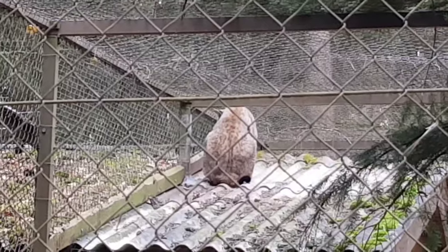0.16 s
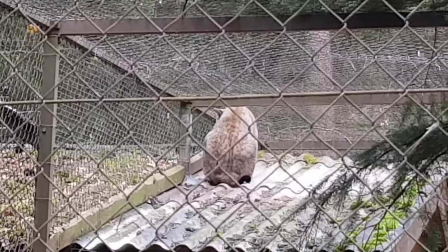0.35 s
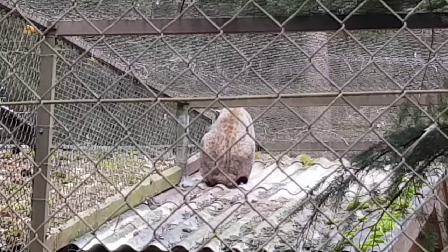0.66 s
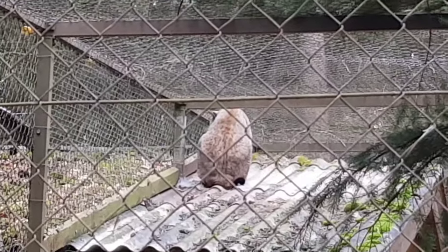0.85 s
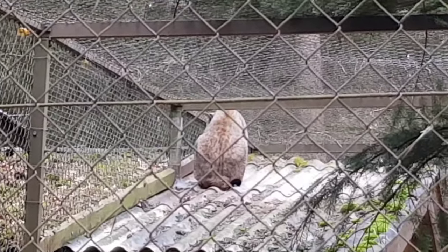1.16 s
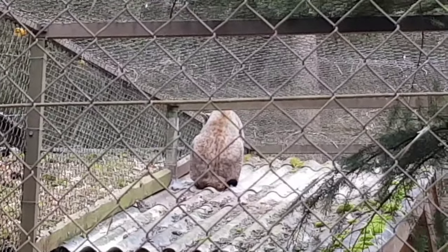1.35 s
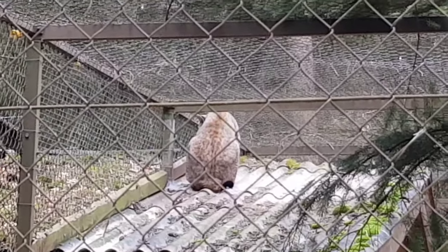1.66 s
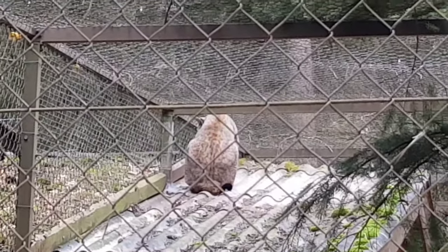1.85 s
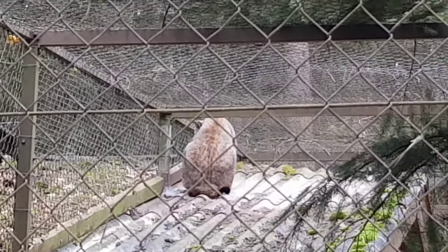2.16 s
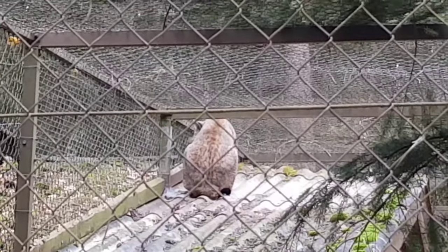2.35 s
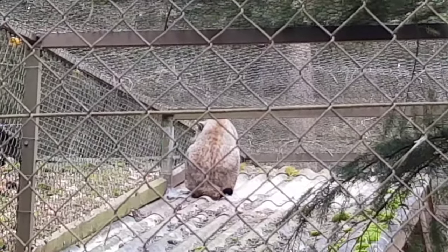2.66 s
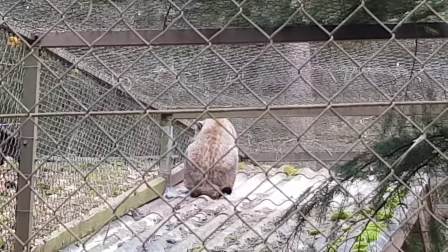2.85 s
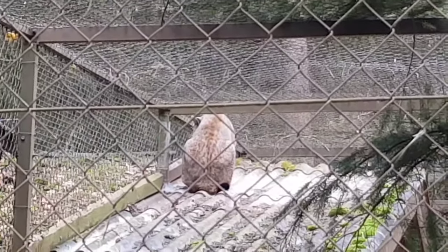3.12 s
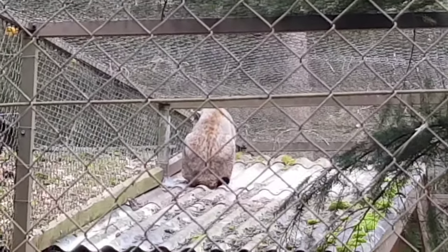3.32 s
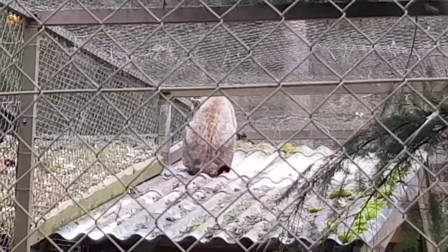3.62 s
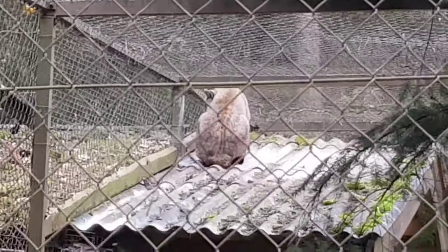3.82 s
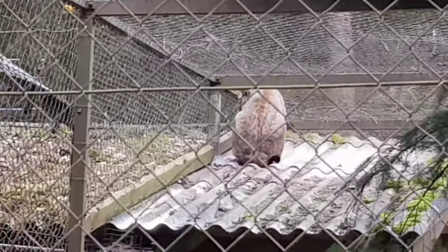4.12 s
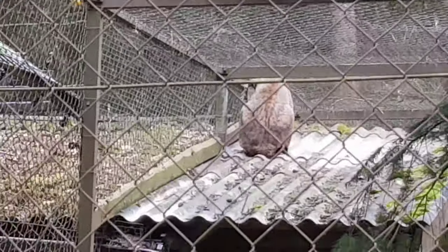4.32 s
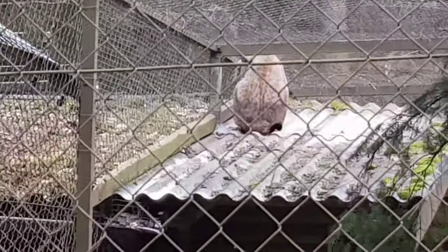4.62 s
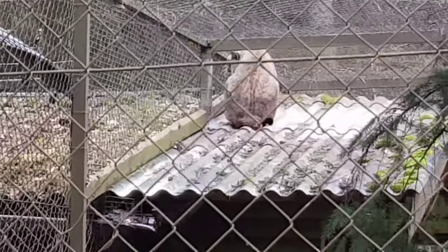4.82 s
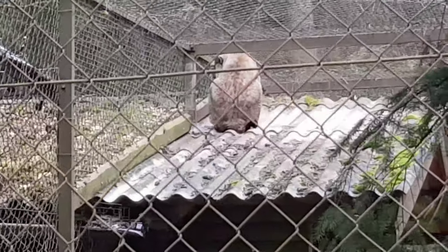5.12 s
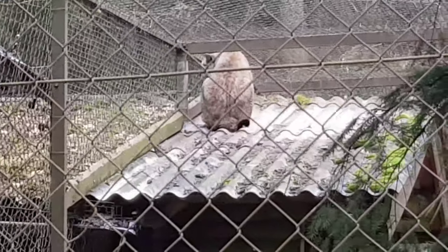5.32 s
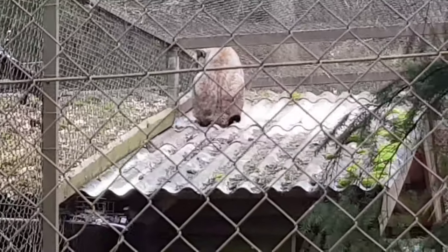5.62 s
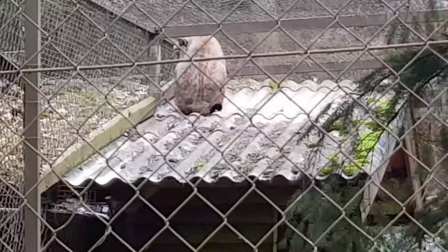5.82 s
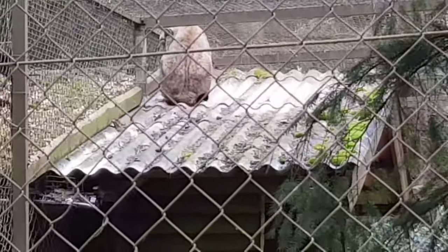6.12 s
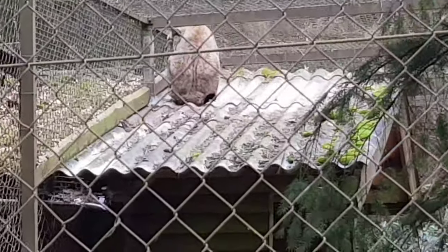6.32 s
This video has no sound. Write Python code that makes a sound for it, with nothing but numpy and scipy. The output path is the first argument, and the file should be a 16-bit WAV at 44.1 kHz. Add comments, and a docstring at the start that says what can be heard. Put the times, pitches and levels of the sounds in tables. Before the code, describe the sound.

A lynx yowls three times, each call rising and sliding down, while small birds whistle and chatter faintly among the trees.

```python
"""A lynx yowling among trees.

A lynx on a shed roof yowls three times, its vocal folds arching up in pitch and sliding down; a second
cat joins the third call. A tit sings two-note phrases, another bird chatters in arched notes, others
whistle and twitter further off. Trees and pens throw the voices back over soft air and a low rumble;
a sleeve rustles and fingers knock close to the microphone."""
import sys
import numpy as np
from scipy import signal
from scipy.fft import rfft, irfft
from scipy.io import wavfile

SR = 44100
rng = np.random.default_rng(int(sys.argv[2]) if len(sys.argv) > 2 else 0)


def int16_out(signal):
    """Quantize to a 16-bit WAV file."""
    q = np.round(np.clip(np.atleast_2d(signal).T, -1, 1) * 32767)
    wavfile.write(sys.argv[1], SR, q.astype(np.int16))


N = 285500
TIME = np.arange(N) / SR
FREQS = np.fft.rfftfreq(N, 1 / SR) + 1e-3


def undb(db):
    """Amplitude ratio of a level in decibels."""
    return 10 ** (np.asarray(db) / 20)


def curve(rows, at=TIME):
    """Linear interpolation of each later column of a table against its first."""
    knots, *columns = np.transpose(rows)
    return [np.interp(at, knots, column) for column in columns]


def colour(points, hz):
    """Interpolation of a spectrum on a log-frequency axis."""
    knots_hz, value = np.transpose(points)
    return np.interp(np.log(hz), np.log(knots_hz), value)


def noise(points):
    """White noise filtered to a spectrum of (Hz, dB) points, at rms 1."""
    x = irfft(rfft(rng.standard_normal(N)) * undb(colour(points, FREQS)), N)
    return x / x.std()


def wander(rate_hz, size=N):
    """Random modulation: low-passed noise of standard deviation 1."""
    x = signal.sosfilt(signal.butter(2, rate_hz, fs=SR, output="sos"), rng.standard_normal(size))
    return x / x.std()


def fade(size, edge_s):
    """A gate with raised-cosine edges."""
    k = np.arange(size)
    return np.sin(np.pi / 2 * np.clip(np.minimum(k, k[::-1]) / (edge_s * SR), 0, 1)) ** 2


def add(track, start_s, x):
    """Superposition of a sound on a track."""
    i = max(int(start_s * SR), 0)
    track[i:i + len(x)] += x[:max(N - i, 0)]


def pan(db):
    """Direction by level difference, left minus right."""
    return undb(np.array([[db], [-db]]) / 2)


def ports(mid, side):
    """Spatial coherence: diffuse sound differs between two close microphone ports mostly in the treble."""
    width = [(60, -30), (250, -16), (600, -17), (1200, -8), (2400, -10), (5000, -11), (12000, -7.5)]
    side = irfft(rfft(side) * undb(colour(width, FREQS)), N)
    return np.array([mid + side, mid - side])


def wood(x, wet_db, build_s, early_db, early_s, shade_db=0, linger=1):
    """Reverberation: roof and fences scatter the sound early, trunks keep it ringing."""
    # Each row: band frequency in Hz, reverberation time in seconds (scaled by linger), relative dB.
    bands = [(256, 0.35, 15.5), (600, 1.74, -0.5), (1310, 1.56, 0), (2400, 1.75, 7.5), (4200, 1.16, 6),
             (9000, 1.4, 5.5)]
    t = TIME[:int(1.6 * SR)]
    hz = np.fft.rfftfreq(len(t), 1 / SR) + 1
    spectra = rfft(rng.standard_normal((2, len(t))))
    tails = 0
    for band, (_, t60, db) in enumerate(bands):
        share = colour([(row[0], k == band) for k, row in enumerate(bands)], hz)
        tails = tails + irfft(spectra * share, len(t)) * undb(db - 60 * t / (t60 * linger))
    tails = tails * (1 - np.exp(-t / build_s)) * (1 + undb(early_db) * np.exp(-t / early_s))
    mid, side = signal.fftconvolve(x[None], tails / np.sqrt(SR / 10), axes=1)[:, :N] * undb(wet_db)
    # Directivity: a caller facing away loses direct treble.
    direct = irfft(rfft(x) * undb(colour([(1300, 0.018), (2600, shade_db)], FREQS)), N)
    return ports(direct + mid, side)


def outdoors():
    """Ambient noise: soft forest air over a distant, slowly swelling rumble."""
    # Spectra. Each row: frequency in Hz, relative level in dB.
    air_spectrum = [(15, -45), (25, -16), (82, -3.5), (140, -3), (198, -19), (378, -16.5), (1140, -9),
                    (1900, -15.5), (2850, -24), (3530, -32), (3930, -28.5), (4380, -8), (4750, -32.5),
                    (6550, -58.5), (15500, -30)]
    rumble_spectrum = [(20, -10.5), (35, -11.5), (50, -0.5), (75, -0.5), (110, -8.5), (160, -18.5),
                       (250, -23), (500, -42)]
    # Envelopes. Each row: time in seconds, level in dB.
    air_level = [(0, -63), (.4, -70), (1.6, -62.5), (6.47, -61.5)]
    rumble_level = [(0, -58.5), (.8, -56), (1.8, -60.5), (2.3, -58.5), (6.47, -58)]
    air = ports(noise(air_spectrum), noise(air_spectrum)) * undb(curve(air_level)[0] + 0.5 * wander(4))
    rumble = ports(noise(rumble_spectrum), noise(rumble_spectrum))
    return air + rumble * undb(curve(rumble_level)[0] + 0.23 * wander(10))


def note(shape, length_s, db, ratio=1, harmonics=((1, 0),), waver=0.0042):
    """Frequency modulation: a wavering tone follows a contour; a beak passes few overtones above 7 kHz."""
    size = int(length_s * SR)
    hz, shape_db = curve(shape, np.linspace(0, 1, size))
    hz = hz * ratio * (1 + waver * wander(200, size))
    phase = 2 * np.pi * np.cumsum(hz) / SR
    tone = 0
    for k, harmonic_db in harmonics:
        beak_loss = 1 + (k > 1) * (k * hz / 6900) ** 24
        tone = tone + undb(harmonic_db) * np.sin(k * phase) / beak_loss
    return np.sqrt(2) * tone * undb(db + shape_db) * fade(size, 0.00022)


def glides(rows, waver):
    """Linear frequency sweeps: short tones that swell as they slide."""
    out = np.zeros(N)
    for start, length, start_hz, end_hz, db in rows:
        shape = [(0, start_hz, 7), (.5, (start_hz + end_hz) / 2, 12.5), (1, end_hz, 3.5)]
        add(out, start, note(shape, length, db, waver=waver))
    return out


def sleeve(roundness=1.77):
    """Friction: cloth hisses in swelling rubs, some dull and some bright, and now and then squeaks."""
    # Each row: frequency in Hz, relative level in dB.
    cloth_spectrum = [(1500, -3.5), (3000, 4), (6000, 0.5), (9000, -7.5), (13000, -6), (15500, -9.5)]
    # Each row: peak time, swell and fade in seconds, level in dB, tilt towards the treble in dB.
    rubs = [(.58, 0.045, 0.038, -67, -6), (1.86, 0.14, 0.17, -59.5, -2), (2.55, 0.3, 0.45, -69.5, 3),
            (3.05, 0.15, 0.18, -75, 12), (3.28, 0.12, 0.44, -66.5, -6.5), (4.7, 0.45, 0.42, -69, 0.5),
            (5.8, 0.078, 0.11, -71.5, 12.5), (6.04, 0.069, 0.13, -49, 2.5), (6.47, 0.14, .05, -61, -3)]
    # Each row: start and length in seconds, first and last pitch in Hz, relative level in dB.
    squeaks = [(2.95, 0.13, 11550, 11000, -77.5), (3.05, 0.078, 11250, 10000, -81.5),
               (3.05, .09, 14000, 12800, -77), (3.19, 0.08, 10150, 9860, -84),
               (3.2, .08, 12300, 12800, -80), (3.42, .1, 9900, 9640, -85)]
    dull = signal.sosfilt(signal.butter(2, 8000, fs=SR, output="sos"), noise(cloth_spectrum))
    bright = signal.sosfilt(signal.butter(2, 8000, "high", fs=SR, output="sos"), noise(cloth_spectrum))
    out = 0
    for peak_s, swell_s, fade_s, db, tilt_db in rubs:
        from_peak = np.maximum((peak_s - TIME) / swell_s, (TIME - peak_s) / fade_s)
        envelope = np.exp(-np.minimum(from_peak, 10) ** roundness)
        out = out + (dull * undb(db - tilt_db) + bright * undb(db + tilt_db)) * envelope
    return out * undb(wander(40)) + glides(squeaks, waver=0.013)


def handling():
    """Contact noise: the sleeve rubs, fingers knock the case, a puff of air buffets the ports."""
    # Each row: time in seconds, relative level in dB, centre in Hz, width in octaves, decay in seconds.
    knocks = [(5.202, -56, 260, 0.96, 0.0058), (5.721, -40.5, 6200, 0.6, 0.0003),
              (5.997, -51.5, 215, 0.62, 0.0034)]
    # Each row: time in seconds, level in dB.
    puff_level = [(.46, -89), (.53, -52.5), (.62, -54.5), (.7, -65)]
    out = sleeve()
    for at_s, db, hz, octaves, decay_s in knocks:
        burst = rng.standard_normal(N) * np.exp(-np.abs(TIME - at_s) / decay_s)
        band = np.exp(-.5 * (np.log2(FREQS / hz) / octaves) ** 2)
        knock = irfft(rfft(burst) * band, N)
        out = out + 2 * undb(db) * knock / np.abs(knock).max()
    puff = undb(curve(puff_level)[0]) * (TIME > puff_level[0][0]) * (TIME < puff_level[-1][0])
    return out + puff * noise([(70, -24), (130, -7), (215, -17.5), (270, -23), (500, -51)])


def twitter(count=70, far_db=-70, low_hz=1900, high_hz=3600, start_s=2.4):
    """Fast pitch modulation makes twittering scratchy: a few nearer notes among many faint far ones."""
    # Each row: start and length in seconds, first and last pitch in Hz, relative level in dB.
    near = [(5.68, 0.018, 2244, 2080, -67.5), (5.87, 0.054, 3230, 3150, -77),
            (6.04, 0.044, 2880, 2600, -66), (6.1, 0.029, 2183, 2935, -64), (6.17, 0.0275, 2750, 2450, -66),
            (6.28, 0.0436, 2480, 3040, -66.5), (6.335, 0.021, 2750, 2210, -62.5),
            (6.413, 0.02, 3330, 2800, -60.5), (6.43, 0.028, 2005, 2350, -70)]
    when, length, pitch, slide, strength = rng.random((count, 5)).T
    hz = low_hz + (high_hz - low_hz) * pitch
    starts = start_s + (N / SR - start_s) * when
    end_hz = hz * (0.98 + 0.405 * slide)
    far = zip(starts, 0.0127 + 0.0151 * length, hz, end_hz, far_db + 5 * (strength - .5))
    return glides(near, waver=0.053) + glides(far, waver=0.0496)


def chatter(notes_per_s=8.1, sag_per_s=.1, swell_db=2.5, scatter_db=2.5, bend=0.0519, lead_s=0.021):
    """Strong harmonics make a bird's arched notes harsh; a short falling tick leads each one in."""
    # Note contours. Each row: fraction of the note, pitch in Hz before transposing, relative dB.
    arched = [(0, 1470, -6.5), (0.18, 2006, -9.5), (.36, 2280, -0.5), (0.541, 2056, -5), (.76, 1745, -7.5),
              (1, 1512, -7)]
    tick = [(0, 2606, -3.5), (.3, 2400, 1), (1, 2025, -16.5)]
    # Each row: harmonic number, relative level in dB.
    partials = [(1, -4.5), (2, 1), (3, -3), (4, -4)]
    # Each row: first and last onset in seconds, relative dB, opening pitch ratio, fundamental lift in dB.
    runs = [(2.122, 2.122, -53, 1.13, 0.5), (2.407, 2.914, -48.5, 1.2, -2), (3.238, 4.355, -50, 1.07, -1.5),
            (4.417, 4.527, -53, 1.02, 8), (4.499, 4.984, -47.5, 0.95, -2), (5.124, 5.247, -48.5, .92, -14),
            (5.324, 5.68, -60.5, .97, 4.5), (6.323, 6.43, -51, 0.98, -0.5)]
    out = np.zeros(N)
    for first_s, last_s, run_db, first_ratio, lift_db in runs:
        count = round((last_s - first_s) * notes_per_s) + 1
        harmonics = [(k, db + lift_db * (k == 1)) for k, db in partials]
        for i, start in enumerate(np.linspace(first_s, last_s, count)):
            # A run sinks in pitch and swells in its middle.
            ratio = first_ratio * (1 - sag_per_s * (start - first_s))
            swell = np.sin(np.pi * i / max(count - 1, 1))
            db = run_db + swell_db * swell + scatter_db * rng.standard_normal()
            shape = [(at, hz * (1 + bend * rng.standard_normal()), level) for at, hz, level in arched]
            add(out, start, note(shape, .034 * rng.uniform(.85, 1.15), db, ratio, harmonics, waver=0.0317))
            add(out, start - lead_s, note(tick, 0.012, db - 6, ratio, harmonics, waver=0.082))
    return out


def songbirds():
    """Nearly pure tones: the tit's two-note phrases and other birds' thin and low whistles."""
    # Note contours. Each row: fraction of the note, nominal pitch in Hz, relative level in dB.
    tit_rise = [(0, 3796, -10), (.15, 3817, -3.5), (.55, 3953, 1), (.8, 4016, 3.5), (1, 4054, -16.5)]
    tit_fall = [(0, 5626, -24), (.05, 4890, -6), (.14, 4390, -4), (.4, 4275, 2.5), (.8, 4240, -3.5),
                (1, 4490, -27.5)]
    thin = [(0, 5250, -10), (.06, 5150, -6.5), (.13, 4920, 3), (.35, 5310, -0.5), (.6, 5540, -0.5),
            (.85, 5670, 0.5), (1, 5400, -16)]
    low_up = [(0, 1456, -6.5), (.25, 1570, 4.5), (.5, 1628, -19), (.8, 1650, -8.5), (1, 1640, 4)]
    low_down = [(0, 1425, -21), (0.251, 1397, -8), (0.399, 1320, -8), (.6, 1320, -9), (.85, 1322, -7.5),
                (1, 1309, -10)]
    # Each row: start in seconds and relative dB of the rising note, the same of the falling, pitch ratio.
    phrases = [(0.032, -51, .175, -49, .985), (0.466, -48.5, .61, -46.5, .987), (.92, -48, 1.065, -50, .99),
               (1.391, -48.5, 1.535, -51, .99), (5.388, -60, 5.532, -57, 1.02), (5.799, -51, 5.932, -49, 1),
               (6.203, -48, 6.33, -51, 1.006)]
    # Each row: start and length in seconds, relative level in dB.
    thin_whistles = [(0.424, 0.23, -65.5), (0.946, 0.17, -62.5), (1.486, 0.19, -62.5), (2.031, 0.22, -65.5),
                     (5.817, 0.2, -77), (6.358, 0.1, -69)]
    low_whistles = [(1.72, 0.1, -47.5), (1.914, .27, -43)]
    out = np.zeros(N)
    for rise_s, rise_db, fall_s, fall_db, ratio in phrases:
        add(out, rise_s, note(tit_rise, .1, rise_db, ratio))
        add(out, fall_s, note(tit_fall, .1, fall_db, ratio))
    for start, length, db in thin_whistles:
        add(out, start, note(thin, length, db))
    for shape, (start, length, db) in zip((low_up, low_down), low_whistles):
        add(out, start, note(shape, length, db))
    return out


def yowl_pitch(t, length, rise_s, slide_s, steepness, start_hz, top_hz, low_hz, drop_hz=85.9, drop_s=.054):
    """The fundamental eases up, slides down in an S and collapses as the air runs out."""
    rise = np.sin(np.pi / 2 * np.minimum(t / rise_s, 1))
    late = (np.maximum(t - rise_s, 0) / slide_s) ** steepness
    arch = start_hz + (top_hz - start_hz) * rise - (top_hz - low_hz) * late / (1 + late)
    return arch - drop_hz * np.exp((t - length) / drop_s)


def yowl(row, jitter=0.026, shimmer=0.43, flutter=0.52, uneven_db=0.83, breath_db=-7,
         open_s=0.22, attack_s=0.021, release_s=0.01):
    """Source and filter: the throat colours the folds' harmonics; rasp shakes and smears their period."""
    # Effort raises pitch and loudness together.
    # Each row: pitch in Hz, relative dB of the fundamental, second harmonic and upper harmonics.
    effort = [(269, -76, -55, -58.5), (362, -61, -46, -49.5), (438.5, -54, -43, -42.5),
              (482, -45.5, -34.5, -43.5), (543, -41.5, -37.5, -39.5), (617, -42, -36.5, -40),
              (645, -38, -35, -40)]
    # Rough start, clear top, hoarser slide. Each row: fraction of the call, relative roughness.
    roughness = [(0, 0.45), (.25, 0.15), (.42, 0.18), (.62, 0.25), (.82, 0.28), (1, 0.28)]
    # Source spectrum. Each row: harmonic number, relative level in dB.
    folds = [(3, -1.5), (4, -2.5), (5, -11.5), (6, -11.5), (8, -11), (10, -17), (14, -28)]
    # Resonances. Each row: frequency in Hz, gain in dB.
    throat = [(900, 9), (1400, 2), (1900, 0.5), (2300, -1), (2650, -3.5), (2850, -12), (3400, -6),
              (4300, -21), (5200, -17.5), (5900, -7.5), (7000, -35)]
    length, *contour, first_db, second_db, upper_db, first_swell, upper_swell, hoarse = row
    t = np.arange(0, length, 1 / SR)
    hz = yowl_pitch(t, length, *contour)
    first, second, upper = curve(effort, hz)
    shut = np.cos(np.pi / 2 * np.minimum(t / open_s, 1))  # overtones are muffled until the mouth opens
    first_db = first_db + first + first_swell * (t - length / 2)
    second_db = second_db + second - 5.5 * shut
    upper_db = upper_db + upper - 12 * shut + upper_swell * (t - length / 2)
    rasp = np.clip(hoarse * curve(roughness, t / length)[0], 0, 1)
    chance = lambda rate_hz: wander(rate_hz)[:len(t)]
    hz = hz * (1 + jitter * rasp * chance(130) + 0.0013 * chance(18.4))
    phase = 2 * np.pi * np.cumsum(hz) / SR
    voice = undb(first_db + uneven_db * chance(17)) * np.sin(phase)
    voice += undb(second_db + uneven_db * chance(18)) * np.sin(2 * phase)
    for k in range(3, 15):
        gain = undb(upper_db + colour(folds, k) + colour(throat, k * hz) + 2 * uneven_db * chance(11))
        smear = flutter * rasp * (min(k, 5) / 3) ** 2.8 * chance(90)  # high harmonics lose pitch first
        voice += gain * np.sin(k * phase + smear)
    voice = np.sqrt(2) * voice * (1 + shimmer * rasp * chance(150))
    # Air escapes once a cycle and hisses in the upper throat resonance.
    hiss = [(400, -32), (900, -19.5), (1500, -20), (1900, -9.5), (2600, -17.5), (2900, -17.5),
            (5500, -21), (9000, -50.5)]
    breath = noise(hiss)[:len(t)] * (1 + np.cos(phase))
    voice += breath * rasp * undb(upper_db + breath_db)
    return voice * np.minimum(t / attack_s, 1) * np.minimum((length - t) / release_s, 1)


def lynxes():
    """Voiced calls superpose: the fourth is the second cat; a fifth barely begins as the scene ends."""
    # Each row: start, length, rise and half-way time of the slide in seconds, steepness of the slide,
    # start, top and low pitch in Hz, dB offsets of the fundamental, second and upper harmonics,
    # swell of the fundamental and of the upper harmonics in dB per second, rasp factor.
    calls = [(.3, .76, .2, 0.31, 2.71, 311.8, 661.5, 372.2, 0, 0, -3, 3, -1.5, 0.96),
             (2.15, 0.7, .172, 0.33, 2.69, 338.3, 667.7, 363.3, -0.5, 0, -1.5, 9, -2, 1.03),
             (4.13, 0.83, 0.22, .28, 2.26, 280.8, 648.2, 386.5, 0.5, 2.5, 0.5, 11, 5.5, 0.97),
             (4.55, .355, .085, .12, 2.3, 389, 495.2, 315, 7, -5, -10, 38, -3, .5),
             (6.42, 0.91, 0.33, .3, 2.6, 276.6, 660, 370, 1.5, -0.5, -6, 0, 0, 1.5)]
    out = np.zeros(N)
    for start, *row in calls:
        add(out, start, yowl(row))
    return out


def scene():
    """Reverberation conveys distance: the cats are near and face away, the birds deeper in the trees."""
    cats = lynxes() * undb(-0.37)
    cats = wood(cats, wet_db=-13, build_s=0.01, early_db=5.5, early_s=0.064, shade_db=-5)
    song = songbirds() * undb(-2.76)
    song = wood(song, wet_db=-6.5, build_s=0.002, early_db=-3.5, early_s=0.066, linger=0.89)
    chat = (chatter() + twitter()) * undb(-1.5)
    chat = wood(chat, wet_db=-8, build_s=0.00061, early_db=10.5, early_s=0.0078)
    near = ports(handling(), handling() * undb(-3.5))
    return cats * pan(.1) + song * pan(0.41) + chat * pan(-2.2) + near + outdoors()


def record(dry):
    """Band limiting: a steep low-pass filter cuts the treble above 15850 Hz."""
    return signal.sosfilt(signal.ellip(10, .2, 70, 15850, fs=SR, output="sos"), dry)


dry = scene()
out = record(dry)
int16_out(out)
```